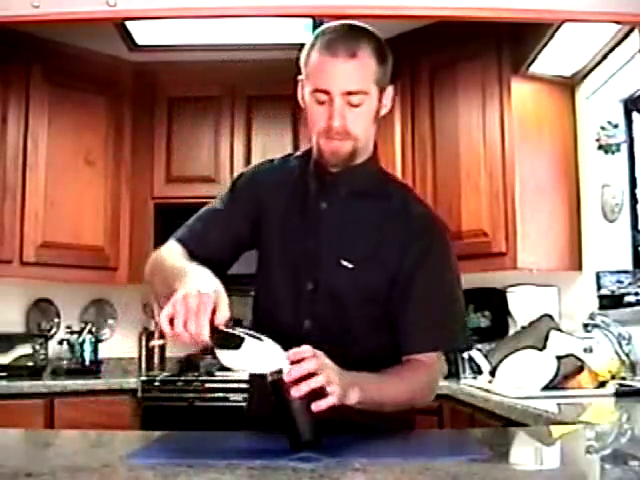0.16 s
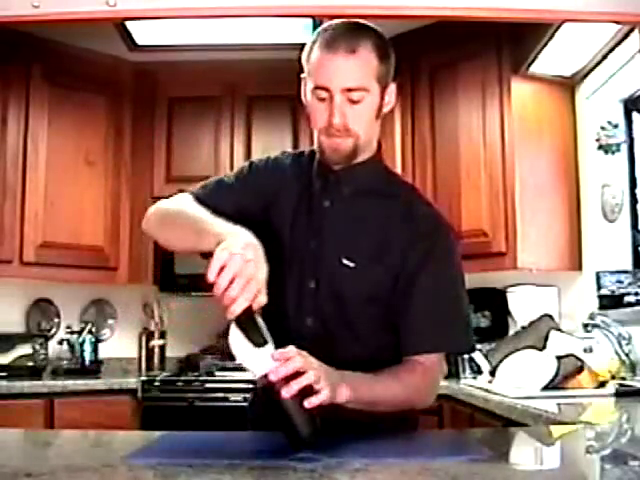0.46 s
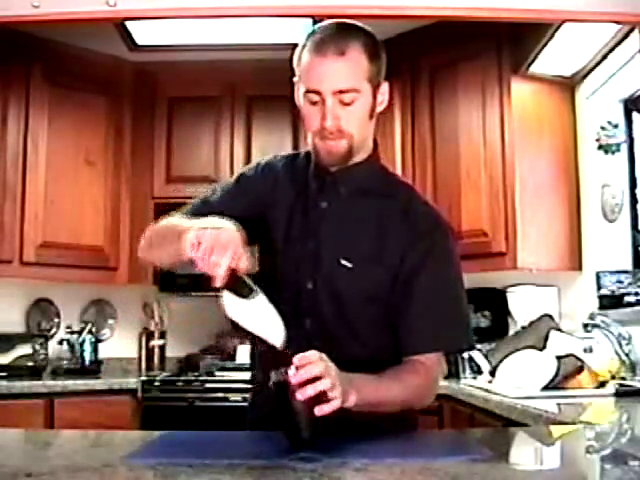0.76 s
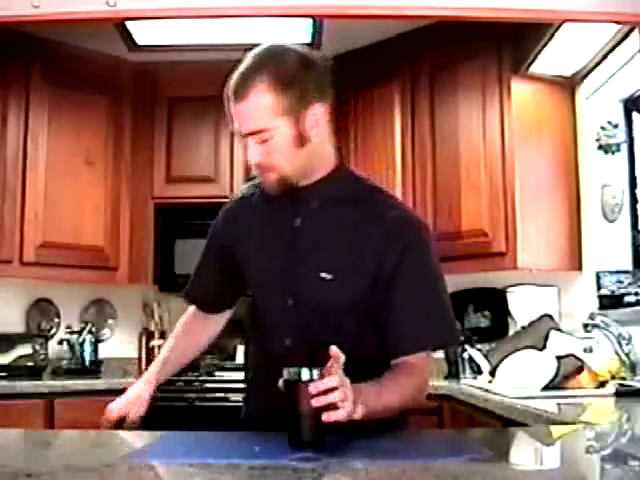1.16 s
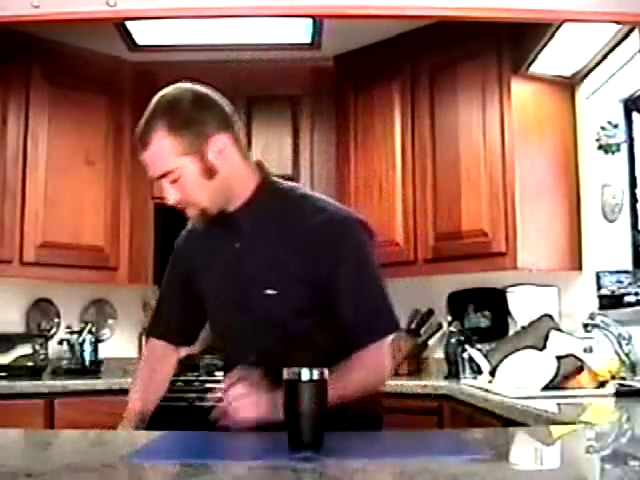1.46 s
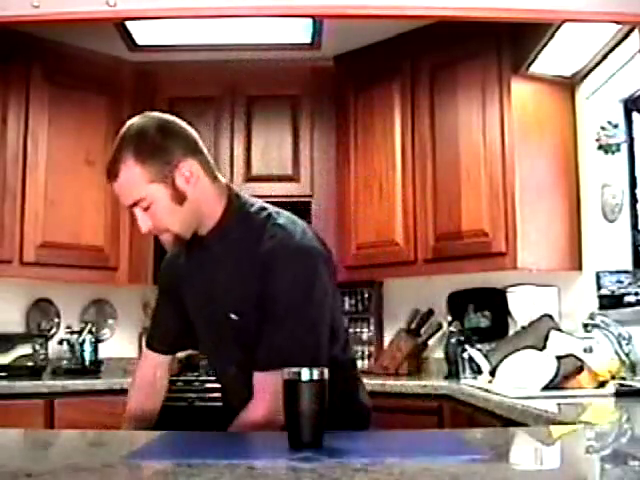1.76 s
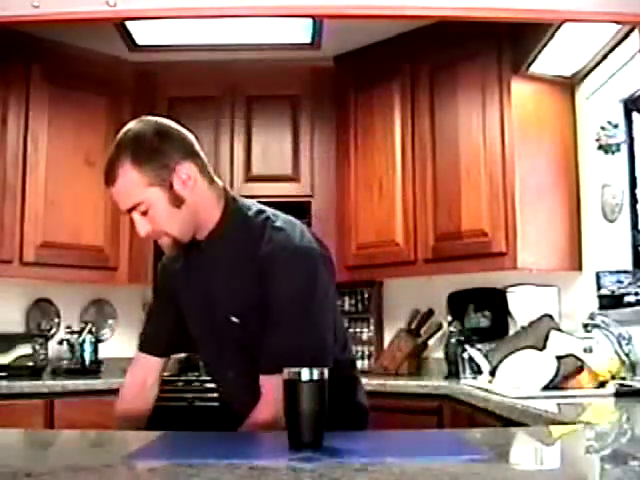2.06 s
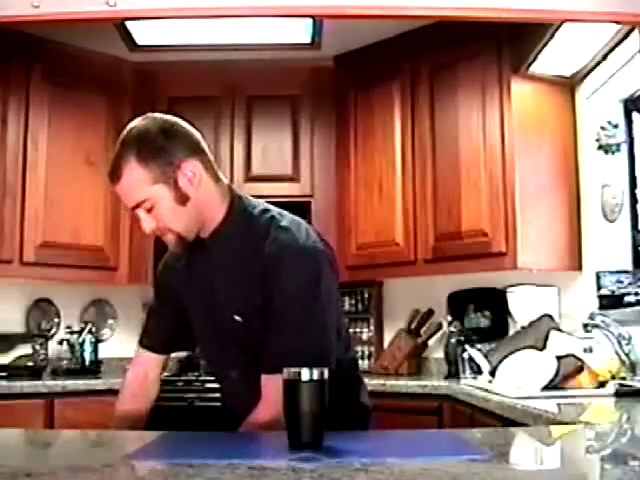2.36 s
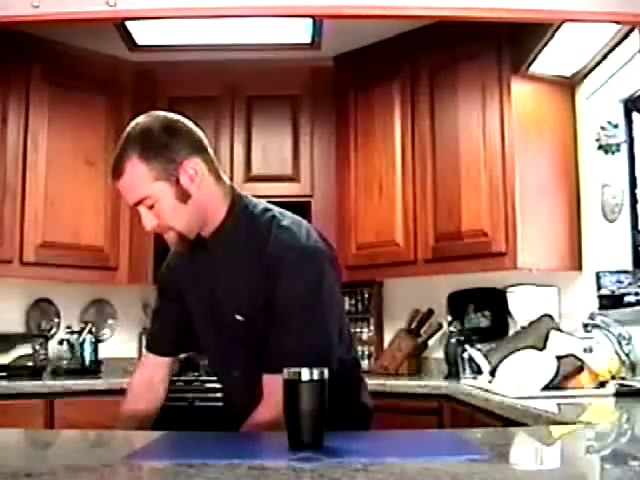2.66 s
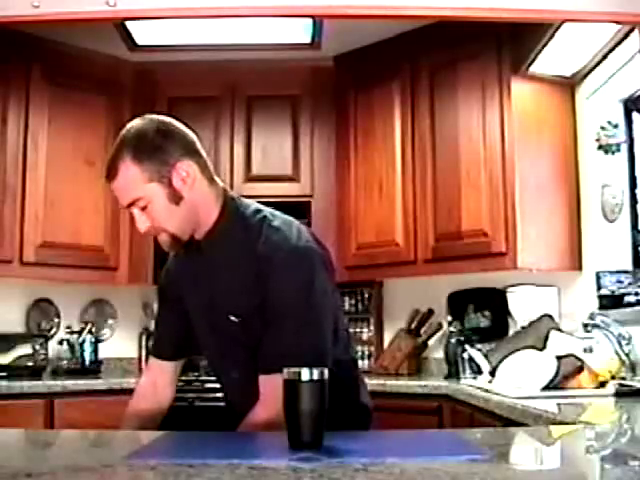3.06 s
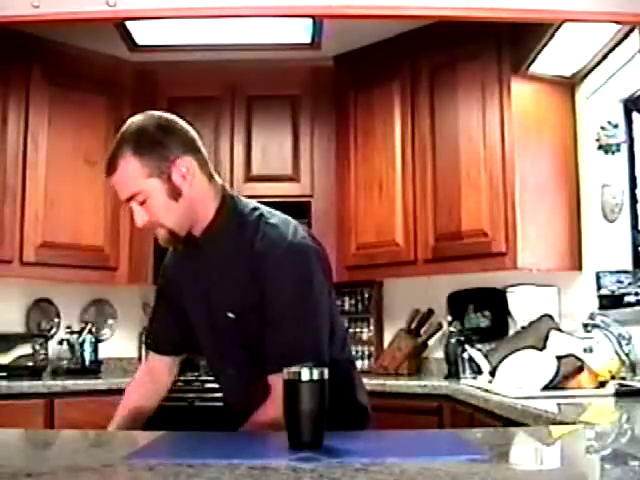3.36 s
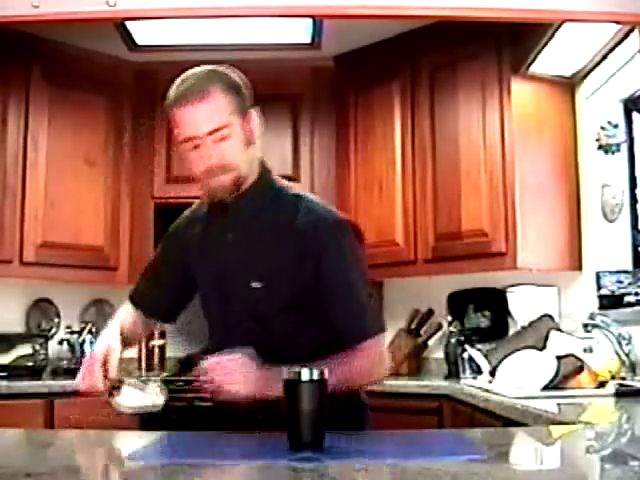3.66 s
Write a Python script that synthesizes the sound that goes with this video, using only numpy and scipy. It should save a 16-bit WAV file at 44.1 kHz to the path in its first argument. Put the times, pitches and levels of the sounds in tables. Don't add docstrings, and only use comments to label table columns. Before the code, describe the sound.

Ice cubes slide with faint cracks, then clatter into an empty steel shaker at 0.24-0.33 s with hollow booms. From 0.58 to 0.95 s the scoop knocks and shakes against the rim, bright ringing over dull scraping. Echoes fade into faint kitchen hum. From 1.6 s the scoop digs through ice, crunching, knocking and booming, loudest around 1.9-2.7 s, with shorter digs near 3.1 and 3.3 s, fading by 3.7 s. Echoing room, limited mono microphone.

```python
import sys
import numpy as np
from scipy import signal
from scipy.fft import rfft, irfft
from scipy.io import wavfile
from scipy.ndimage import uniform_filter1d

SR = 44100
rng = np.random.default_rng(int(sys.argv[2]) if len(sys.argv) > 2 else 0)


def to_linear_factor(level_db):
    exponent = np.asarray(level_db, float) / 20
    return 10 ** exponent


def output_pcm(signal):
    pcm = np.clip(np.atleast_2d(signal).T, -1, 1) * 32767
    wavfile.write(sys.argv[1], SR, np.round(pcm).astype(np.int16))


N = 167580


def rms_one(x):
    return x / np.sqrt(np.mean(x ** 2) + 1e-20)


def bandpass(x, low_hz, high_hz):
    return signal.sosfilt(signal.butter(2, [low_hz, high_hz], "band", fs=SR, output="sos"), x)


def level(rows):
    s, db = np.transpose(rows)
    return to_linear_factor(np.interp(np.arange(N) / SR, s, db, left=-150, right=-150))


def at_hz(points, hz):
    f, v = np.transpose(points)
    return np.interp(np.log(np.maximum(hz, 1)), np.log(f), v)


def colour(x, spectrum):
    size = 4096
    gain = to_linear_factor(at_hz(spectrum, np.arange(size // 2 + 1) * SR / size))
    cepstrum = irfft(np.log(gain / np.sqrt(np.mean(gain ** 2))))
    cepstrum[1:size // 2] *= 2
    cepstrum[size // 2 + 1:] = 0
    return signal.fftconvolve(x, irfft(np.exp(rfft(cepstrum))))[:N]


def clicks(per_s, spread_db, clump_db, clump_hz):
    r = np.exp(-2 * np.pi * clump_hz / SR)
    clump = rms_one(signal.lfilter([1], [1, -2 * r, r * r], rng.standard_normal(N)))
    sizes = to_linear_factor(spread_db * np.minimum(rng.exponential(1, N), 3.5)) * rng.choice([-1, 1], N)
    happens = rng.random(N) < per_s / SR
    return rms_one(sizes * to_linear_factor(clump_db * clump) * happens)


def blows(rows):
    out = np.zeros(N)
    s, db = np.transpose(rows)
    out[(s * SR).astype(int)] = to_linear_factor(db)
    return out


def scatter(x, decay_s):
    r = np.exp(-2 / SR / decay_s)
    energy = signal.lfilter([1 - r], [1, -r], x ** 2 + 1e-30)
    return np.sqrt(energy) * rng.standard_normal(N)


def knocks(rows, rise_s, t60_s):
    out, t = np.zeros(N + SR), np.arange(SR // 4) / SR
    for s, db, hz in rows:
        fade = to_linear_factor(db - 60 * t / t60_s) * -np.expm1(-t / rise_s)
        out[int(s * SR):][:len(t)] += fade * np.sin(2 * np.pi * hz * t)
    return out[:N]


def hollow(x, peaks):
    out, power = 0, 0
    for k, (hz, width, db) in enumerate(peaks):
        r = np.exp(-np.pi * width / SR)
        gain = (1 - r * r) / 2
        poles = [1, -2 * r * np.cos(2 * np.pi * hz / SR), r * r]
        out = out + (-1) ** k * to_linear_factor(db) * signal.lfilter([gain, 0, -gain], poles, x + 1e-18)
        power = power + to_linear_factor(2 * db) * width * np.pi / SR
    return out / np.sqrt(power)


def metal(x, modes, uneven_db, muffle_db=0):
    out, late = 0, np.maximum(np.arange(N) / SR - 0.59, 0)
    for hz, db, t60 in modes:
        r, w = to_linear_factor(-60 / (t60 * SR)), 2 * np.pi * hz / SR
        strength_db = db + uneven_db * rng.standard_normal(N) - muffle_db * late * hz / 1000
        hit = x * to_linear_factor(strength_db) + 1e-18
        out = out + np.sqrt(1 - r * r) * signal.lfilter([0, np.sin(w)], [1, -2 * r * np.cos(w), r * r], hit)
    return out


def hum():
    # pitch in Hz, strength in dB per Hz.
    hum_colour = [(20, -23), (80, -25.5), (159, -4), (259, -5), (290, -5), (422, -6.5), (917, -11),
                  (1120, -16), (14500, -34)]
    return to_linear_factor(-52.5) * colour(rng.standard_normal(N), hum_colour)


def cubes():
    # start in seconds, peak in dB, brightness in dB.
    landings = [(0.0809, -34.5, 10.5), (0.119, -32.5, 3.5), (0.163, -33.5, -0.5), (0.2378, -19, 3),
                (0.2595, -14, -1), (0.2859, -18, 3), (0.3054, -22, 22), (0.4355, -25.5, 12.5),
                (0.4603, -35, 17), (0.5161, -22, -2.5), (0.5515, -31, 17), (0.6543, -30, -11),
                (0.8844, -11, 4), (0.9095, -36.5, -16.5), (0.9614, -39, -12), (1.0472, -45, -4),
                (1.2698, -43, 11)]
    size = 900
    dull, bright, t = np.zeros(N), np.zeros(N), np.arange(size) / SR
    for s, db, bright_db in landings:
        i, noise = int(s * SR), rng.standard_normal(size)
        dull[i:i + size] += to_linear_factor(db - 10.5 - bright_db) * noise * np.exp(-t / 0.0054)
        bright[i:i + size] += to_linear_factor(db - 19.5 + bright_db) * noise * np.exp(-t / 0.007)
    return dull, bandpass(bright, 4500, 12000)


def cup():
    # time in seconds, level of the tumbling in dB.
    tumble = [
        (0.2372, -40),
        (0.239, -28.5),
        (0.284, -30.5),
        (.33, -33.5),
        (0.46, -52),
        (0.558, -37),
        (0.57, -38),
        (0.58, -47),
    ]
    # pitch in Hz, strength in dB per Hz.
    clatter_colour = [(100, -21), (300, -6), (1000, -9), (1700, -4.5), (2500, -3.5), (5000, -11.5),
                      (10000, -20.5), (14500, -31)]
    # pitch in Hz, width in Hz, strength in dB.
    cup_peaks = [(490, 155, -8), (712, 18, 6), (778, 24, -3.5), (1320, 43, -8), (1734, 154, -5.5),
                 (1634, 190, -4), (2420, 150, -9.5), (3030, 110, -9), (3490, 130, -11), (4560, 130, -12.5)]
    # time in seconds, peak in dB.
    cup_hits = [
        (.2378, 2.5),
        (.2475, -1.5),
        (.2595, 7.5),
        (.2865, 7.5),
        (.300, 11.5),
        (.312, 8),
        (.325, -1),
    ]
    # start in seconds, peak in dB, pitch in Hz.
    cup_tones = [
        (.2378, -30, 778),
        (.2385, -22.5, 712),
        (.262, -25, 777),
        (.287, -21, 712),
        (.312, -22, 707),
        (.36, -29, 690),
    ]
    dull, bright = cubes()
    tumbling = scatter(clicks(2100, spread_db=-2.0, clump_db=4.5, clump_hz=39.0), decay_s=0.0049)
    inside = level(tumble) * tumbling + dull
    clatter = to_linear_factor(3) * colour(inside, clatter_colour)
    boom = hollow(to_linear_factor(-13.0) * inside + blows(cup_hits), cup_peaks)
    return clatter + boom + bright + knocks(cup_tones, rise_s=0.0019, t60_s=0.17)


def thuds():
    # time in seconds, peak in dB.
    thud_hits = [
        (.238, -50),
        (.578, -46),
        (.65, -47),
        (1.88, -48),
        (1.95, -51),
        (2.42, -59),
        (3.25, -50),
    ]
    t, swell_s = np.arange(8000) / SR, 0.015
    wobble = np.e * t / swell_s * np.exp(-t / swell_s) * np.sin(2 * np.pi * 37.5 * t)
    return signal.fftconvolve(blows(thud_hits), wobble)[:N]


def scoop():
    # time in seconds, level of the rattle in dB.
    scoop_rattle = [
        (.575, -76),
        (.577, -25.5),
        (.6, -50),
        (.64, -24.5),
        (.71, -19.5),
        (.8, -21.5),
        (.9, -31),
        (.95, -50),
        (1.0, -77),
    ]
    # time in seconds, peak in dB.
    scoop_hits = [
        (.5771, -26.5),
        (.586, -29),
        (.72, -24),
        (.765, -23),
        (.82, -21),
        (.87, -32),
        (.91, -28),
    ]
    # pitch in Hz, strength in dB, seconds to die by 60 dB.
    scoop_modes = [(759, -10.5, 0.097), (1950, -9.5, 0.006), (2700, -9, 0.022), (3500, -21, 0.034),
                   (4310, -8, 0.02), (4440, -3, 0.019), (4580, -14, .02), (5800, -5, 0.024),
                   (6100, -5.5, 0.023), (9430, -8, 0.0083), (10570, -9.5, 0.011)]
    # pitch in Hz, strength in dB per Hz.
    scrape_colour = [(88, -23), (150, -23), (762, -1.5), (1250, -15.5), (2640, 5.5), (8330, 0.5),
                     (14500, -13.5)]
    rattle = scatter(clicks(2000, spread_db=2.5, clump_db=1.5, clump_hz=40), decay_s=0.0039)
    touch = level(scoop_rattle) * rattle
    struck = to_linear_factor(-7.0) * touch + to_linear_factor(24.5) * scatter(blows(scoop_hits), decay_s=0.0045)
    return metal(struck, scoop_modes, uneven_db=2.0) + to_linear_factor(-2) * colour(touch, scrape_colour)


def shaker_rim():
    # time in seconds, level of the rattle in dB.
    rim_rattle = [
        (.596, -74),
        (.598, -33),
        (.65, -23.5),
        (.7, -16),
        (.77, -26.5),
        (.85, -29.5),
        (.93, -56),
        (.96, -79),
    ]
    # time in seconds, peak in dB.
    rim_hits = [(.5975, -20.5), (.620, -25), (.636, -28), (.655, -19.5), (.674, -18), (.695, -32),
                (.712, -25), (.735, -18.5), (.755, -17.5), (.795, -26), (.830, -25)]
    rim_hz = [2661, 2715, 4814, 4870, 7570, 8301, 8210, 11000, 10700, 12200, 2652, 4340, 4840]
    # strength in dB, seconds to die by 60 dB.
    rim_ring = [(-0.5, 0.034), (-5, 0.047), (-3, 0.043), (-4, 0.049), (-9, 0.069), (7.5, 0.069), (-11, .05),
                (-6, .04), (-13, 0.04), (-8, .04), (-1, 0.39), (-34, .4), (-24, .4)]
    rattle = level(rim_rattle) * clicks(350, spread_db=3.5, clump_db=2.5, clump_hz=30.6)
    strikes = to_linear_factor(28.5) * scatter(blows(rim_hits), decay_s=0.0023)
    modes = [(hz, db, t60) for hz, (db, t60) in zip(rim_hz, rim_ring)]
    return metal(rattle + strikes, modes, uneven_db=1.0, muffle_db=5)


def ice_bin():
    # time in seconds, level in dB.
    digs = [
        [(1.619, -40), (1.625, -26.5), (1.65, -41.5), (1.745, -36.5), (1.77, -26.5), (1.873, -22.5),
         (1.94, -19), (2.05, -25.5), (2.23, -23.5)],
        [(2.23, -27), (2.29, -21.5), (2.37, -26.5), (2.395, -31), (2.425, -20), (2.58, -22), (2.76, -25),
         (2.91, -38), (2.98, -40.5)],
        [(2.98, -37.5), (3.085, -37), (3.125, -26), (3.19, -33.5), (3.24, -39), (3.316, -56), (3.32, -36)],
        [(3.32, -20), (3.328, -26), (3.36, -23), (3.43, -33.5), (3.5, -39), (3.56, -49.5), (3.731, -63.5),
         (3.75, -74)],
    ]
    # pitch in Hz, strength in dB per Hz.
    ice_colour = [(71, -52), (120, -35), (159, -14), (433, -10), (585, -2.5), (760, -8), (1250, -5.5),
                  (10100, -17.5), (14500, -29.5)]
    # pitch in Hz, width in Hz, strength in dB.
    bin_peaks = [(485.4, 21, -1.5), (596, 12, 3), (646, 32, -1), (698, 31, -2.5), (866, 60, -12.5),
                 (1044, 104, -5), (1250, 105, -2.5), (1490, 130, -3), (2125, 24, -7), (1800, 84, -21),
                 (2390, 140, -16), (2900, 120, -4)]
    # time in seconds, peak in dB.
    bumps = [(1.623, -37), (1.7637, -34), (1.885, -5), (1.95, -9), (2.045, -13.5), (2.11, -9),
             (2.4127, -18), (2.432, -7), (2.5085, -40), (2.56, -10.5), (2.66, -12), (2.69, -20),
             (2.886, -22), (2.966, -30.5), (3.061, -25.5), (3.116, -33), (3.1605, -23), (3.3256, -20),
             (3.357, -11.5), (3.465, -32)]
    # start in seconds, peak in dB, pitch in Hz.
    booms = [(1.624, -29.5, 572), (1.645, -32.5, 475), (1.67, -38, 596), (1.715, -32, 640),
             (1.745, -28.5, 622), (1.765, -24, 596), (1.80, -30, 587), (1.843, -25, 668), (1.88, -25, 646),
             (1.92, -18.5, 479), (1.945, -23.5, 623), (2.038, -21, 633), (2.09, -21, 676), (2.18, -34, 613),
             (2.265, -29, 603), (2.31, -40, 620), (2.335, -29.5, 484), (2.40, -21.5, 604),
             (2.455, -16, 594), (2.49, -24, 587), (2.525, -41, 630), (2.56, -21, 598), (2.60, -19, 581),
             (2.685, -22, 586), (2.715, -24, 581), (2.745, -28, 594), (2.83, -42.5, 590), (2.89, -36, 559),
             (3.02, -36, 587), (3.115, -25.5, 585), (3.175, -32, 606.5), (3.25, -36, 562), (3.29, -44, 584),
             (3.324, -26.5, 668), (3.35, -25, 660), (3.385, -24, 606), (3.435, -29, 691),
             (3.48, -30.5, 690), (3.515, -43, 654), (3.56, -42, 659), (3.63, -57, 657)]
    # start in seconds, peak in dB, pitch in Hz.
    lumps = [(1.795, -38, 1320), (1.875, -27, 830), (2.04, -21.5, 1157), (2.115, -24, 1166),
             (2.28, -25, 1240), (2.42, -24, 1250), (2.44, -22, 2150), (2.60, -24, 1118),
             (2.66, -20.5, 1297), (2.72, -29, 2125), (3.15, -33.5, 1976), (3.355, -36, 1413),
             (3.435, -29.5, 1384), (3.6, -48, 1410)]
    push = sum(level(dig) for dig in digs)
    crunch = scatter(push * clicks(1500, spread_db=3.5, clump_db=2.0, clump_hz=29.6), decay_s=0.0034)
    crunch = crunch + to_linear_factor(21) * scatter(blows(bumps), decay_s=0.0086)
    shifts = scatter(push * clicks(200, spread_db=-1.5, clump_db=2.0, clump_hz=30), decay_s=0.0026)
    ice = to_linear_factor(-4.5) * colour(crunch, ice_colour) + to_linear_factor(6.0) * knocks(lumps, rise_s=.0015, t60_s=0.054)
    boom = to_linear_factor(-11) * hollow(shifts, bin_peaks) + to_linear_factor(1.5) * knocks(booms, rise_s=.003, t60_s=0.13)
    return ice + boom


def kitchen(x, gap_s):
    # pitch in Hz, seconds to die by 60 dB.
    room_t60 = [(200, 0.3), (700, 0.49), (2500, 0.63), (6000, 0.39), (13000, 0.32)]
    t, tail = np.arange(SR) / SR, 0
    white = rng.standard_normal((2, SR))
    for k, low in enumerate(40 * 2. ** np.arange(9)):
        band = bandpass(white[k % 2], low, min(2 * low, 20000))
        tail = tail + band * to_linear_factor(-60 * t / at_hz(room_t60, low * 1.4))
    tail = tail * np.clip(t / gap_s, 0, 1)
    return signal.fftconvolve(x, tail / np.sqrt(np.sum(tail ** 2)))[:N]


def moving(x, gap_s):
    turn = np.arange(N) / SR / .07
    out = 0
    for k in range(4):
        share = np.maximum(1 - np.abs((turn - k) % 4 - 2), 0)
        out = out + kitchen(x * np.sqrt(share), gap_s)
    return out


def scene():
    near, far = cup() + scoop() + shaker_rim(), ice_bin()
    room = moving(to_linear_factor(-7.0) * near + to_linear_factor(-0.1) * far, gap_s=0.0036)
    return np.tile(to_linear_factor(-2.5) * near + to_linear_factor(-2.0) * far + room + hum() + thuds(), (2, 1))


def band_limit(x):
    return signal.sosfilt(signal.butter(12, 15410, fs=SR, output="sos"), x)


def record(dry):
    limit_db, release_db_per_s, limit_share, clip_top = -16.5, 59, 0.65, .22
    ramp = release_db_per_s * np.arange(N) / SR
    held = np.maximum.accumulate(20 * np.log10(np.abs(dry[0]) + 1e-9) + ramp) - ramp
    turn_down_db = limit_share * uniform_filter1d(np.maximum(held - limit_db, 0), size=45)
    x = dry * to_linear_factor(-turn_down_db)
    thump = bandpass(x ** 2, 18, 90)
    x = clip_top * np.tanh(x / clip_top) + 0.96 * thump
    mix = signal.sosfilt(signal.ellip(8, .5, 75, 14250, fs=SR, output="sos"), x)
    return band_limit(mix)


dry = scene()
out = record(dry)
output_pcm(out)
```